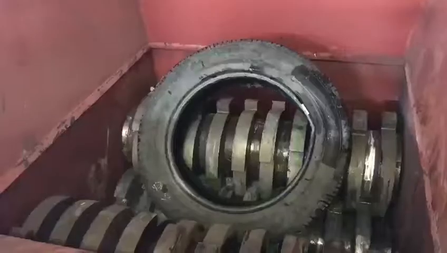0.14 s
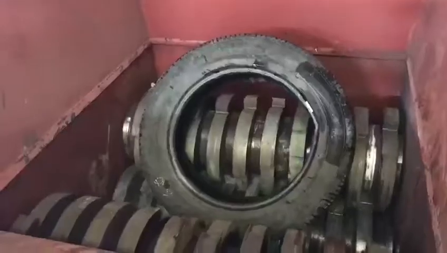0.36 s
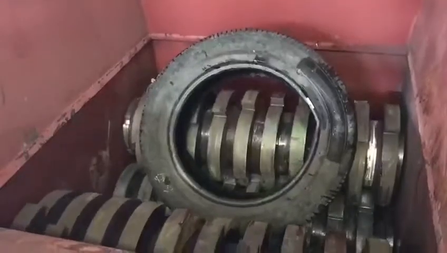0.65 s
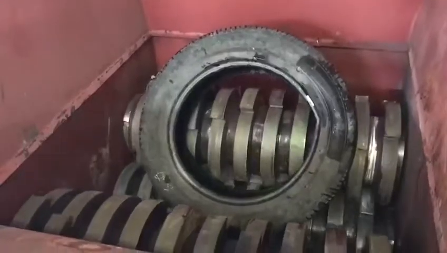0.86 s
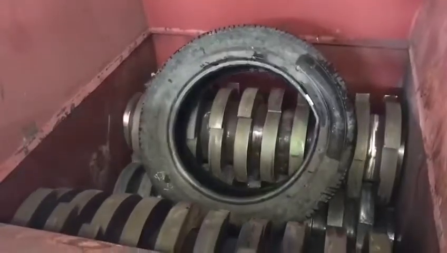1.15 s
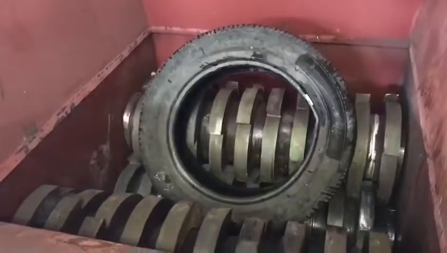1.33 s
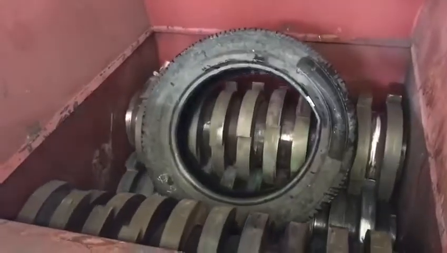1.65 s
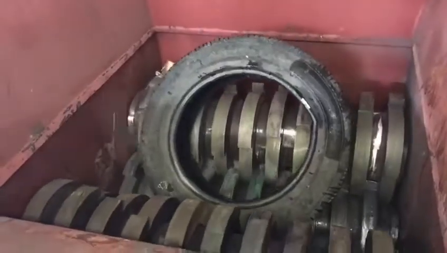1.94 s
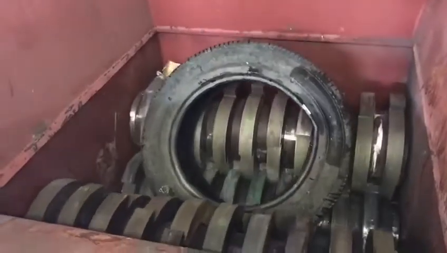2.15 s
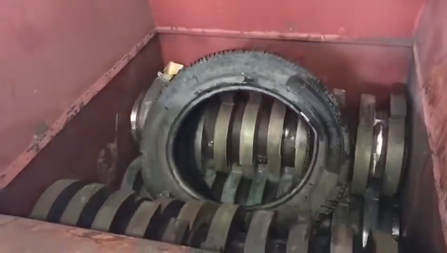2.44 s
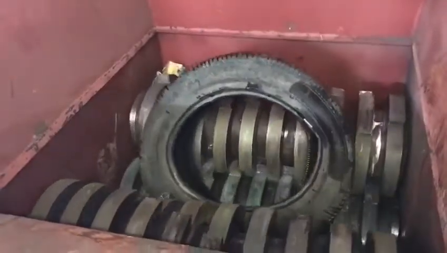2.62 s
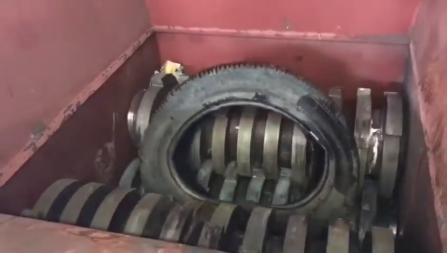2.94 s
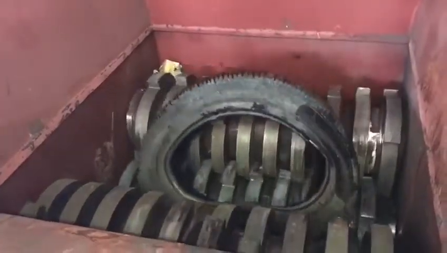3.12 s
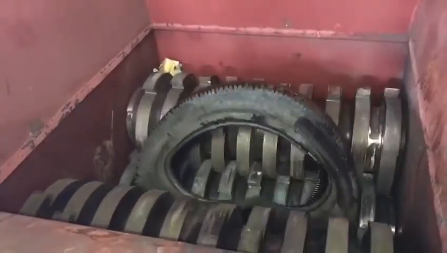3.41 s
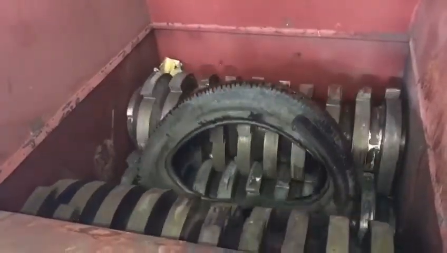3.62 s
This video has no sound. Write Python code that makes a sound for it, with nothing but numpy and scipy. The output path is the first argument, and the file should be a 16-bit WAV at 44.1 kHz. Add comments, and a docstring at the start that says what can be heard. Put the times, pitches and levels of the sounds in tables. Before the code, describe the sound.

An industrial shredder hums and whines empty, then crunches and tears loudly into a rubber tire

```python
"""After a moment of silence a twin-shaft shredder cuts in, running empty: wavering sines make the motor hum, one
of them beating, and the drive whine, and filtered grains make the gearbox churn. Then it bites into a tire.
Hooks knock on the rubber as ringing modes and bursts of coloured grains. Dense grains tear in waves, joined by
dragged rubber and a rough groan, while a low wavering tone rumbles in the frame under the load.
Churn, tearing, dragging and knocks ring briefly in the steel hopper; the sound stops with the machine at work."""
import sys
import numpy as np
from scipy import signal
from scipy.fft import rfft, irfft, next_fast_len
from scipy.io import wavfile

SR = 44100
rng = np.random.default_rng(int(sys.argv[2]) if len(sys.argv) > 2 else 0)


def wrap_up_sound(samples):
    """Save the sound to the file named by the first command line argument, as 16-bit audio."""
    columns = np.atleast_2d(samples).T
    # keep every value between -1 and 1, then stretch to whole-number steps
    tamed = np.clip(columns, -1, 1)
    steps = np.round(tamed * 32767).astype(np.int16)
    wavfile.write(sys.argv[1], SR, steps)


N = 166257  # length in samples
HOPPER_DB = -8  # reflections against direct sound, for churn, tearing and dragging


def amp(db):
    """Decibels to gain."""
    return 10 ** (np.asarray(db) / 20)


def unit(x):
    """Scales to rms 1."""
    return x / np.sqrt(np.mean(x ** 2) + 1e-20)


def curve(points):
    """A table of (seconds, value), read at every sample."""
    return np.interp(np.arange(N) / SR, *np.transpose(points))


def effort(points, rise_s):
    """Gain of a layer that fades in up to the first point of its dB curve."""
    return amp(curve(points)) * np.clip((np.arange(N) / SR - points[0][0]) / rise_s + 1, 0, 1)


def read(points, hz):
    """A table of (Hz, value), read on a log-frequency axis."""
    f, value = np.transpose(points)
    return np.interp(np.log(hz + 1), np.log(f + 1), value)


def colour(x, points):
    """Causal, minimum-phase filter with the given spectrum."""
    size = 2 * next_fast_len(N)
    log_gain = np.log(amp(read(points, abs(np.fft.fftfreq(size, 1 / SR)))))
    kernel = np.fft.ifft(np.exp(np.conj(signal.hilbert(log_gain)))).real[:4096]
    return signal.oaconvolve(x, kernel)[:N]


def wander(rate_hz):
    """Smooth chance of rms 1 that falls off steeply above the given rate."""
    points, points_per_s = 2048, 500
    f = np.fft.rfftfreq(points, 1 / points_per_s)
    lowpass = (f > 0) / (1 + (f / rate_hz) ** 4)
    slow = irfft(rfft(rng.standard_normal(points)) * lowpass)
    return unit(np.interp(np.arange(N) / SR, np.arange(points) / points_per_s, slow))


def tone(hz, db, waver_db, drift_hz, rate_hz):
    """A sine that wavers in level around the given rms and drifts in pitch."""
    turns = np.cumsum(hz + drift_hz * wander(rate_hz)) / SR + rng.random()
    return np.sqrt(2) * amp(db + waver_db * wander(rate_hz)) * np.sin(2 * np.pi * turns)


def grains(per_s, spread_db, hiss):
    """Random clicks, their size spread in dB, over a bed of countless tiny ones."""
    size = amp(spread_db * np.minimum(rng.exponential(1, N), 4)) * rng.choice([-1, 1], N)
    clicks = unit(size * (rng.random(N) < per_s / SR))
    return unit(clicks + hiss * rng.standard_normal(N))


def hopper(x, wet_db):
    """Adds the dense reflections of the steel walls, roughly keeping the power."""
    # Reverberation of the hopper. Each row: frequency in Hz, t60 in seconds
    decay = [(100, 0.23), (500, 0.44), (3000, 0.17), (11000, 0.26)]
    # half a second of reflections, about 3000 a second
    taps = rng.choice([-1., 1.], SR // 2) * (rng.random(SR // 2) < 3000 / SR)
    hz, t, z = signal.stft(taps, SR, nperseg=256)
    tail = signal.istft(z * amp(-60 * t / read(decay, hz)[:, None]), SR, nperseg=256)[1]
    wet = signal.oaconvolve(x, tail / np.linalg.norm(tail))[:N]
    return (x + amp(wet_db) * wet) / np.sqrt(1 + amp(wet_db) ** 2)


def gearbox():
    """Many small tooth contacts merge into a fluttering churn."""
    # Level of the churn as the shafts turn. Each row: time in seconds, relative level in dB
    churn_level = [(.12, 0.5), (.9, -0.1), (1.4, 0.5), (2.1, -0.5), (3.77, -1.5)]
    # Colour of the churn. Each row: frequency in Hz, relative level in dB per Hz
    churn_colour = [(20, -38), (33, -36), (50, -3.5), (62, -12.5), (82, -11), (100, -9.5), (147, -12.5),
                    (170, -9), (200, -6.5), (290, -6.5), (345, -13.5), (420, -15.5), (520, -16),
                    (700, -12.5), (1000, -13.5), (1120, -12.5), (1350, -17.5), (1750, -13.5), (2150, -23),
                    (2900, -26.5), (3600, -25.5), (4000, -31), (5000, -38), (6500, -37.5), (7030, -29),
                    (7600, -44), (9500, -46.5), (11800, -48)]
    flutter = amp(0.15 * wander(rate_hz=140))
    contacts = grains(per_s=2500, spread_db=2.6, hiss=1.0) * flutter
    churn = unit(colour(hopper(contacts, HOPPER_DB), churn_colour))
    return amp(-25 + curve(churn_level)) * churn


def motors():
    """Steady motor tones, one swelling slowly as the two motors slip past each other, under fuzzier gear tones."""
    # Motor tones. Each row: pitch in Hz, level in dB before the hum curve
    hum = [(224.8, -35.5), (261.3, -25)]
    # The hum fades as the load comes on.
    # Each row: time in seconds, then relative level in dB of the steady tones and of the beating tone
    hum_level = np.array([(.12, -3, -1.5), (.8, -1.2, -1.5), (1.1, 1, -1), (1.4, .5, .3), (1.7, 2, -1),
                          (2.0, 1.5, -1.5), (2.45, -.5, -8), (2.7, -3, -13), (3.1, -12, -22),
                          (3.77, -20, -30)])
    # Tones of the gear stages. Each row: pitch in Hz, level in dB before the trim
    gear_tones = [(598, -44), (680, -45), (750, -44.5), (1094, -44), (1108, -45), (1239, -46),
                  (1658, -43.5), (1725, -46), (1798, -42.5)]
    # Tones of the turning shafts. Each row: pitch in Hz, level in dB before the trim
    shaft_tones = [(148.5, -45), (368, -47), (418, -44), (437, -42), (1383, -45)]
    # The strongest gear tone, which comes and goes. Each row: time in seconds, level in dB
    mesh_level = [(.12, -34), (.6, -38), (1.1, -48), (1.75, -37), (2.4, -43)]
    hum_waver_db, gear_waver_db, gear_drift_hz = 0.5, 3.5, 1.5
    gear_trim_db, shaft_trim_db = -1, -0.5
    steady_level, beating_level = curve(hum_level[:, [0, 1]]), curve(hum_level[:, [0, 2]])
    low = sum(tone(hz, db + steady_level, hum_waver_db, drift_hz=0.72, rate_hz=4.9) for hz, db in hum)

    beat_period_s, beat_dip_s, beat_depth = 0.61, 0.42, 0.62  # weakest at the dip and every period after
    beat_turns = (np.arange(N) / SR - beat_dip_s) / beat_period_s
    beat = abs(1 - beat_depth * np.exp(2j * np.pi * beat_turns))
    pair = beat * tone(301, -27.2 + beating_level, hum_waver_db, drift_hz=0.42, rate_hz=11.5)

    gears = sum(tone(hz, db + gear_trim_db, gear_waver_db, gear_drift_hz, rate_hz=3.5)
                for hz, db in gear_tones)
    shafts = sum(tone(hz, db + shaft_trim_db, gear_waver_db, gear_drift_hz, rate_hz=8.1)
                 for hz, db in shaft_tones)
    mesh = tone(1175, curve(mesh_level), hum_waver_db, gear_drift_hz, rate_hz=5)
    return low + pair + gears + mesh + shafts


def drive():
    """A cluster of clean switching tones and, about an octave up, one that ripples with the motor current."""
    # Switching tones of the motor drives. Each row: pitch in Hz, level in dB before trim and curve
    whine = [(3251, -48.6), (3326, -49.7), (3450, -44), (3465.7, -46), (3535, -44), (3550, -41.4),
             (3604.8, -45.6), (3650, -52), (3674.4, -36.6), (3749.6, -50)]
    # The lower whine thins out under load. Each row: time in seconds, relative level in dB
    lower_level = [(.12, 0), (.7, 0.5), (1.9, 0), (2.3, -3), (3.77, -5)]
    # Level of the upper whine. Each row: time in seconds, relative level in dB
    upper_level = [(.12, -3), (.75, 3.5), (1.14, -7), (1.3, -3), (1.7, -4), (1.9, -1.5), (3.77, -11)]
    whine_trim_db = -0.5
    cluster = sum(tone(hz, db + whine_trim_db, waver_db=1, drift_hz=0.54, rate_hz=2.5) for hz, db in whine)

    upper_hz, upper_db = 7001, -41
    ripple_hz, ripple_depth, ripple_rad_turns = 69.7, 0.35, 0.1  # the last is phase swing in turns
    t = np.arange(N) / SR
    ripple = np.cos(2 * np.pi * ripple_hz * t)
    upper = (1 + ripple_depth * ripple) * np.sin(2 * np.pi * (upper_hz * t + ripple_rad_turns * ripple))
    return cluster * amp(curve(lower_level)) + np.sqrt(2) * amp(upper_db + curve(upper_level)) * upper


def frame():
    """The frame shudders with the load on the shafts: a low tone, unsteady in level and pitch."""
    # The rumble heaves with each bite. Each row: time in seconds, level in dB
    load = [(.12, -38), (1.2, -39), (1.37, -31.5), (1.68, -46), (1.92, -25), (2.03, -40), (2.13, -26.5),
            (2.21, -33), (2.26, -20), (2.3, -26), (2.345, -18.5), (2.385, -27), (2.42, -22), (2.56, -23),
            (2.61, -36), (2.72, -35), (2.79, -12.5), (2.86, -24), (2.915, -15), (3.0, -22), (3.09, -26),
            (3.17, -32), (3.3, -25.5), (3.47, -23), (3.58, -37), (3.77, -29)]
    return tone(52, curve(load), waver_db=2.2, drift_hz=5, rate_hz=36)


def dragging():
    """The carcass sticks and slips between the cutters with a dull crunch and a rough groan that shifts in pitch."""
    # Rubber dragged between the cutters. Each row: time in seconds, level in dB before the trim
    drag = [(2.22, -27), (2.31, -19.5), (2.45, -17.5), (2.56, -24.5), (2.66, -17.5), (2.73, -21),
            (2.79, -20), (2.93, -19.5), (2.99, -26), (3.04, -16.5), (3.11, -31), (3.22, -18.5), (3.36, -24),
            (3.52, -21.5), (3.63, -38), (3.77, -27.5)]
    # Colour of the dragged rubber. Each row: frequency in Hz, relative level in dB per Hz
    rubber = [(50, -7.5), (85, -11), (118, -17), (150, -15), (185, 5), (215, -19), (300, -7), (440, 0.5),
              (520, -2.5), (610, -0.5), (720, -5.5), (1300, -11), (2200, -12), (5000, -34)]
    # Low groan while the carcass is squeezed. Each row: time in seconds, relative level in dB, pitch in Hz
    squeeze = np.array([(2.25, -32, 130), (2.37, -22.5, 121.3), (2.52, -23.5, 116.8), (2.67, -23, 111.6),
                        (2.74, -28, 125.9), (2.84, -27, 143.2), (3.1, -29, 146.2), (3.361, -32, 105),
                        (3.77, -54, 98)])
    # Colour of the noise in the groan. Each row: frequency in Hz, relative level in dB per Hz
    groan_colour = [(35, -42), (60, -7), (85, 0), (116, 8), (150, 1), (185, 1), (215, -24), (260, -2),
                    (600, -46)]
    rubber_trim_db, groan_tone_db, groan_noise_db = 1, -1.5, -4.5
    lurch = amp(-0.5 * wander(rate_hz=48))
    slips = hopper(grains(per_s=260, spread_db=0, hiss=0.77) * lurch, HOPPER_DB)
    rub = amp(rubber_trim_db) * effort(drag, rise_s=0.071) * unit(colour(slips, rubber))

    judder = tone(curve(squeeze[:, [0, 2]]), groan_tone_db, waver_db=2.5, drift_hz=13, rate_hz=45)
    crunch = amp(groan_noise_db) * unit(colour(grains(per_s=210, spread_db=1.5, hiss=0.46), groan_colour))
    groan = effort(squeeze[:, :2], rise_s=0.1) * (judder + crunch)
    return rub + groan


def patchy(x):
    """Lets each band swell and sink on its own."""
    # Borders between the bands, in Hz
    edges_hz = [900, 1600, 2800, 4800, 7500]
    spectrum = rfft(x)
    band = np.searchsorted(edges_hz, np.fft.rfftfreq(N, 1 / SR))
    return sum(irfft(spectrum * (band == k), N) * amp(1.23 * wander(rate_hz=22))
               for k in range(len(edges_hz) + 1))


def tearing():
    """Cords and rubber snap in dense waves of shifting colour."""
    # Tearing effort. Each row: time in seconds, level in dB before the trim
    tear = [(1.945, -36), (1.975, -29.5), (2.01, -33), (2.045, -27), (2.09, -39), (2.14, -35),
            (2.186, -28.5), (2.22, -28), (2.268, -22.5), (2.305, -15.5), (2.345, -18.5), (2.39, -22.5),
            (2.46, -21.5), (2.52, -23), (2.58, -20), (2.645, -18), (2.69, -22.5), (2.74, -22.5),
            (2.785, -17.5), (2.83, -19), (2.9, -16), (2.96, -21.5), (3.02, -21.5), (3.095, -28),
            (3.125, -22), (3.15, -24), (3.205, -19), (3.29, -22.5), (3.38, -26), (3.47, -23), (3.53, -28.5),
            (3.58, -25.5), (3.63, -30), (3.7, -24.5), (3.77, -23)]
    # Colour of the tearing. Each row: frequency in Hz, relative level in dB per Hz
    rip = [(300, 1.5), (700, -4.5), (1400, 2.5), (2000, 0), (2700, 0.5), (3300, 1.5), (3800, 2.5),
           (4500, 0.5), (4950, -3), (6500, -1.5), (7400, -7), (9300, -6.5), (10200, -11), (11500, -13)]
    rip_trim_db = 4.5
    flutter = amp(1.2 * wander(rate_hz=90))
    snaps = grains(per_s=2500, spread_db=0.5, hiss=0.76) * flutter
    ripping = unit(patchy(colour(hopper(snaps, HOPPER_DB), rip)))
    return amp(rip_trim_db) * effort(tear, rise_s=0.053) * ripping


def knocks():
    """Each hook that snaps free gives a hollow thump, roughened by the shifting grip, a clatter and a bright crack."""
    # Hooks knocking on the tire. Each row: start in seconds, relative thump level in dB, thump pitch in Hz,
    # thump t60 in seconds, relative clatter level in dB, relative crack level in dB
    hits = [(1.604, -23, 430, .06, -21, -38), (1.763, -7, 385, .032, -11, -27),
            (1.779, -14, 460, .04, -26, -42), (1.796, -14, 400, .03, -19, -42),
            (1.963, -25, 431, .06, -25, -33), (2.047, -10, 700, .022, -7, -13.5),
            (2.053, -12, 400, .04, -22, -32), (2.064, -25, 820, .04, -23, -24),
            (2.296, -24, 450, .05, -11, -10), (2.327, -17, 258, .08, -13, -14),
            (2.385, -21, 428, .06, -18, -24), (2.468, -25, 430, .055, -12, -14),
            (2.645, -23, 603, .09, -14, -13), (2.838, -20, 182, .11, -11, -18),
            (2.915, -27, 588, .1, -13, -8), (3.016, -16, 435, .09, -8, -15),
            (3.203, -12, 305, .06, -7, -18), (3.218, -14, 415, .04, -14, -28),
            (3.245, -20, 440, .04, -13, -30), (3.279, -19, 380, .06, -13, -18),
            (3.408, -25, 448, .06, -15, -21), (3.484, -8, 456.6, .075, -16, -11),
            (3.504, -22, 560, .04, -20, -20), (3.525, -17, 465, .07, -8.5, -22),
            (3.585, -21, 441, .07, -18, -12)]
    # Modes of the struck carcass. Each row: multiple of the thump pitch, relative level in dB
    carcass = [(1, 6), (1.24, -6), (2.2, -28)]
    # Colour of the clatter. Each row: frequency in Hz, relative level in dB per Hz
    clatter_colour = [(100, -15), (280, -11), (430, -5), (620, -8), (900, -5), (1300, -9), (2200, -23),
                      (5000, -40)]
    # Colour of the crack. Each row: frequency in Hz, relative level in dB per Hz
    crack_colour = [(300, -27.5), (800, 12.5), (1700, 9.5), (4200, 2), (6500, -4), (8000, -9.5),
                    (11500, -9)]
    thump_rise_s, noise_rise_s, clatter_t60_s, crack_t60_s = 0.003, 0.002, 0.1, 0.11
    wobble, rough_db, rough_hz = 0.05, 2, 110  # wobble is a share of the pitch
    thump_room_db, noise_room_db = -13, -1.5
    thumps, clatter, crack = np.zeros((3, N))
    strain, grip = wander(rough_hz), wander(rough_hz)
    for s, thump_db, hz, t60, clatter_db, crack_db in hits:
        start = round(s * SR)
        span = slice(start, min(start + SR // 2, N))
        t = np.arange(span.stop - span.start) / SR
        fall = np.log(1000) * t  # divided by a t60, the exponent of a 60 dB decay
        turns = hz * np.cumsum(1 + wobble * strain[span]) / SR
        modes = sum(amp(db) * np.sin(2 * np.pi * ratio * turns) for ratio, db in carcass)
        ring = amp(rough_db * grip[span]) * modes
        thumps[span] += amp(thump_db) * (1 - np.exp(-t / thump_rise_s)) * np.exp(-fall / t60) * ring
        rise = np.minimum(t / noise_rise_s, 1)
        clatter[span] += amp(clatter_db) * rise * np.exp(-fall / clatter_t60_s)
        crack[span] += amp(crack_db) * rise * np.exp(-fall / crack_t60_s)
    rattle = grains(per_s=1500, spread_db=3.0, hiss=1.0)
    noisy = clatter * unit(colour(rattle, clatter_colour)) + crack * unit(colour(rattle, crack_colour))
    return hopper(2 * thumps, thump_room_db) + hopper(noisy, noise_room_db)


def scene():
    """The running machine and the tire in its cutters."""
    machine = gearbox() + motors() + drive() + frame()
    tire = dragging() + tearing() + knocks()
    return (machine + tire)[None]


def record(dry):
    """The sound cuts in, peaks are rounded off, and the treble is cut."""
    start_s, fade_s, ceiling, edge_hz = 0.12, 0.0049, 0.92, 11850
    x = dry * np.clip((np.arange(N) / SR - start_s) / fade_s, 0, 1)
    x = x / (1 + (x / ceiling) ** 6) ** (1 / 6)
    lowpass = signal.firwin(301, edge_hz, window=("kaiser", 8), fs=SR)
    return signal.oaconvolve(x, lowpass[None], "same")


dry = scene()
out = record(dry)
wrap_up_sound(out)
```